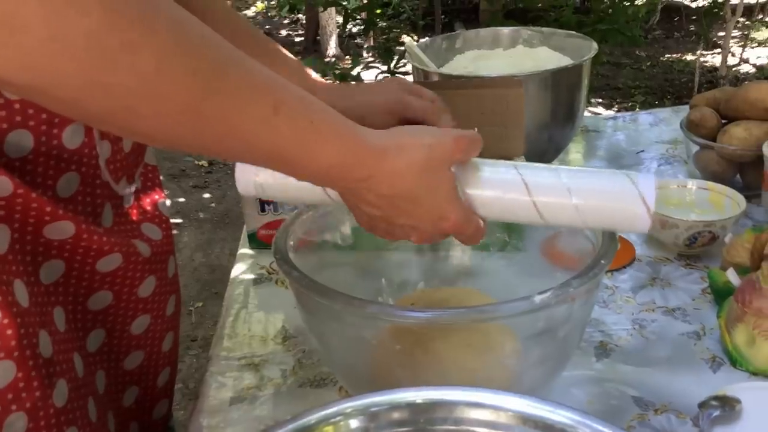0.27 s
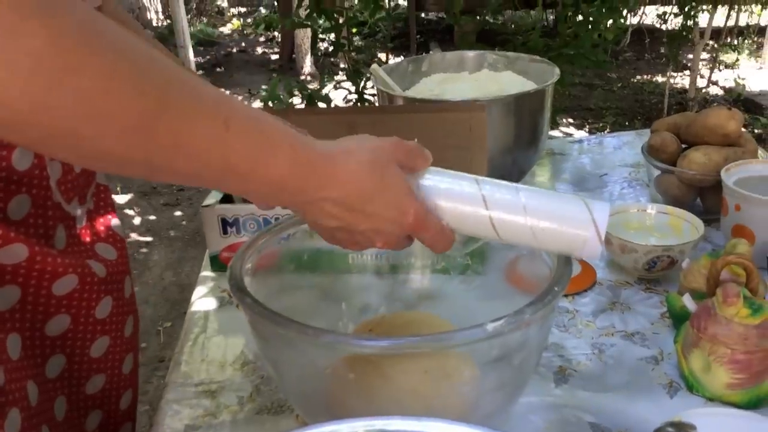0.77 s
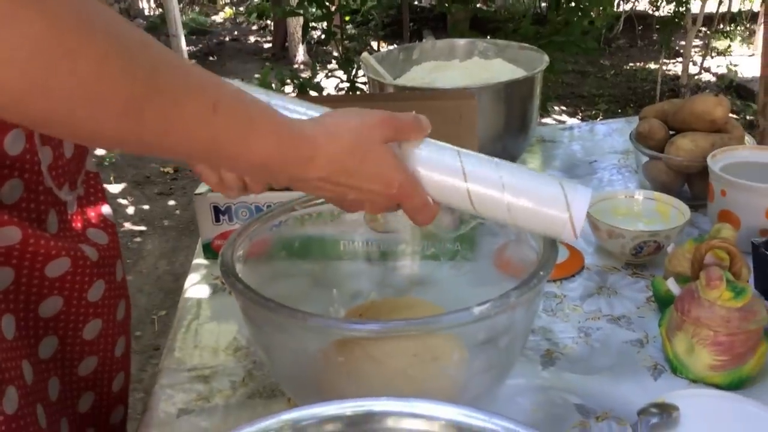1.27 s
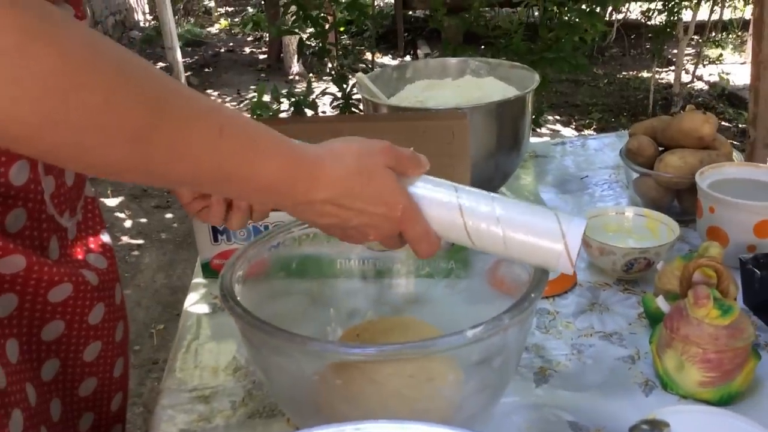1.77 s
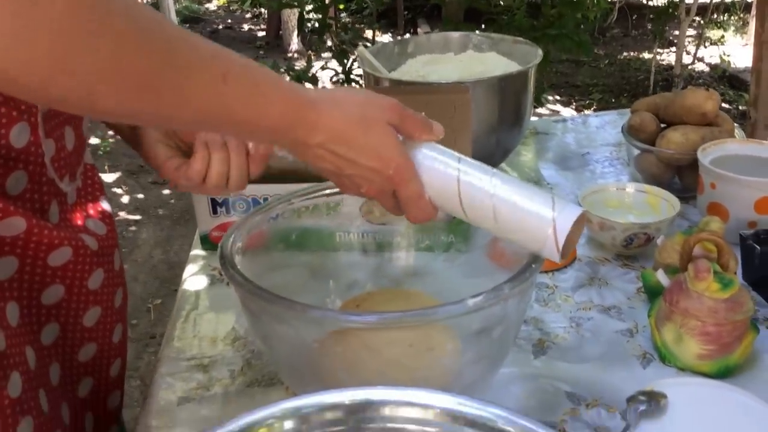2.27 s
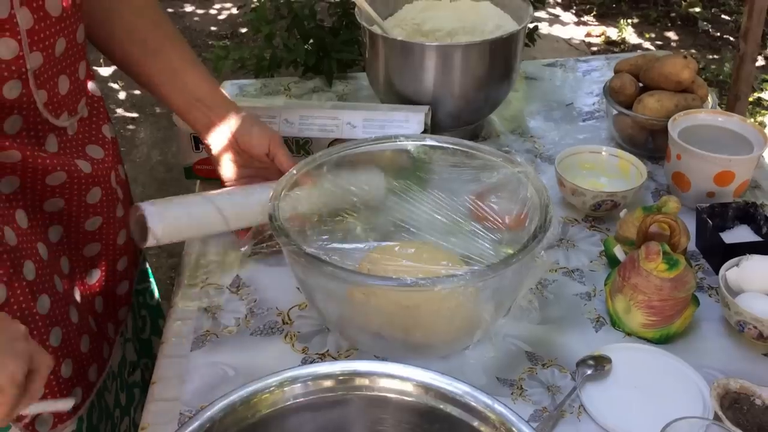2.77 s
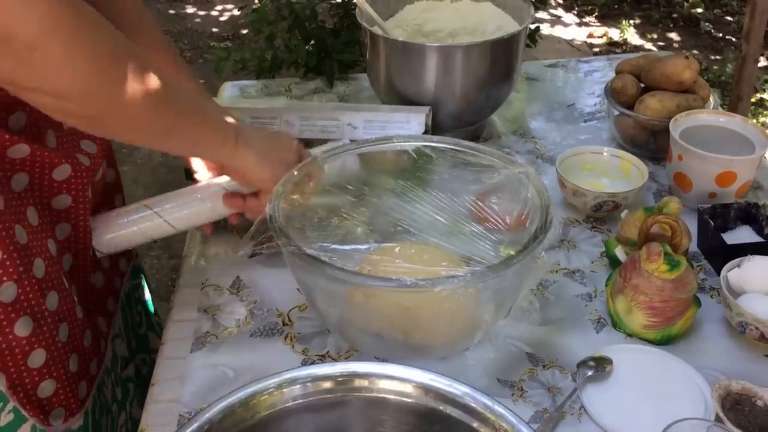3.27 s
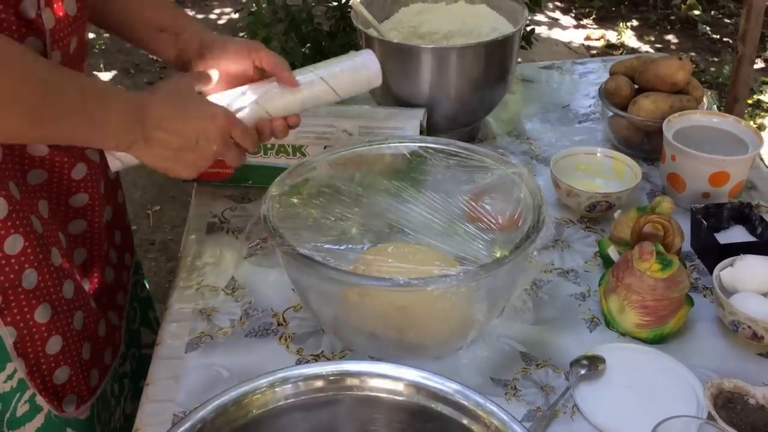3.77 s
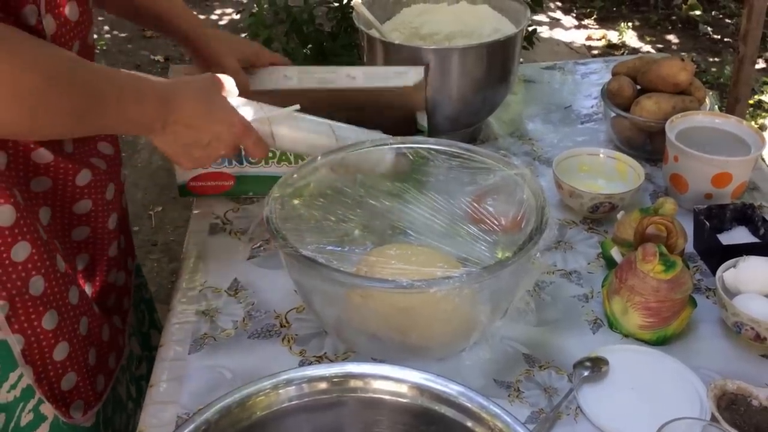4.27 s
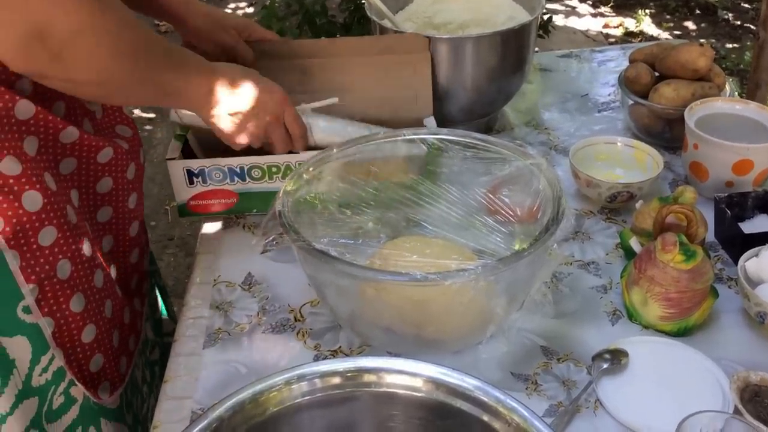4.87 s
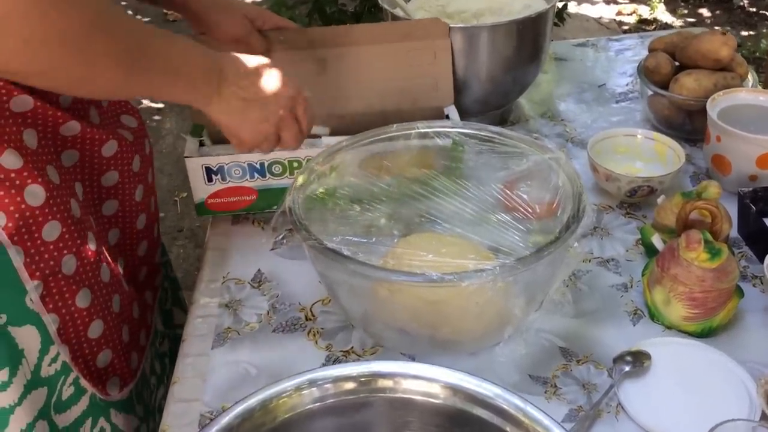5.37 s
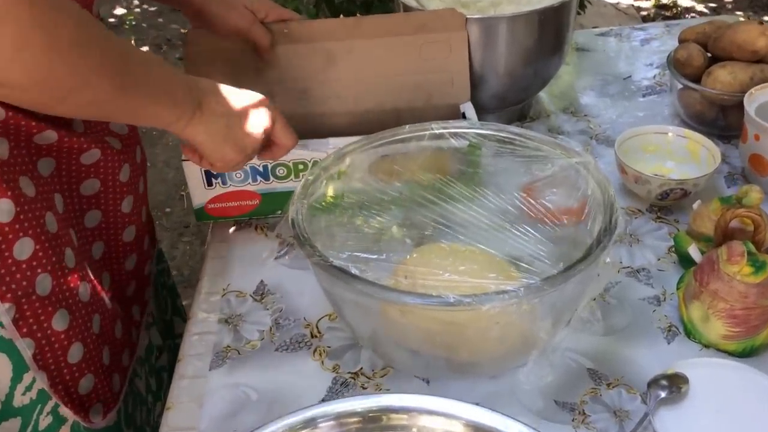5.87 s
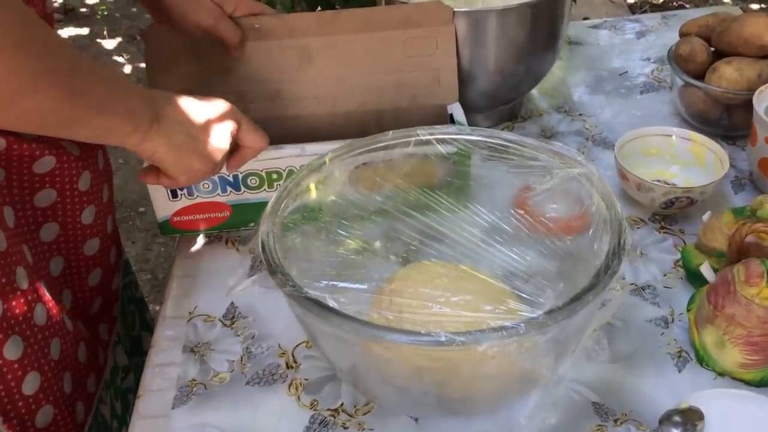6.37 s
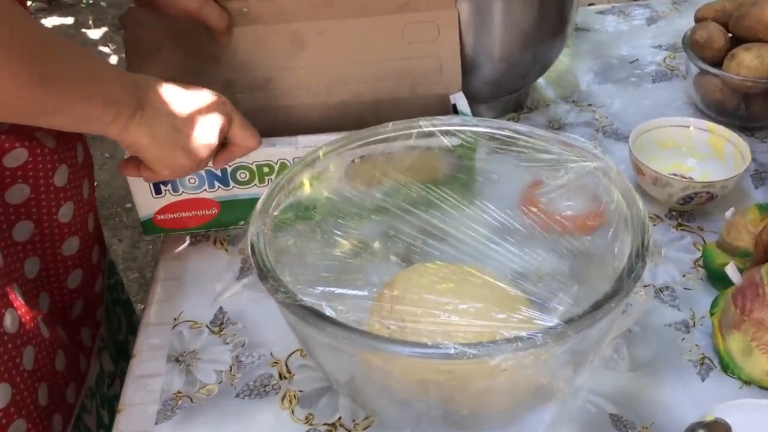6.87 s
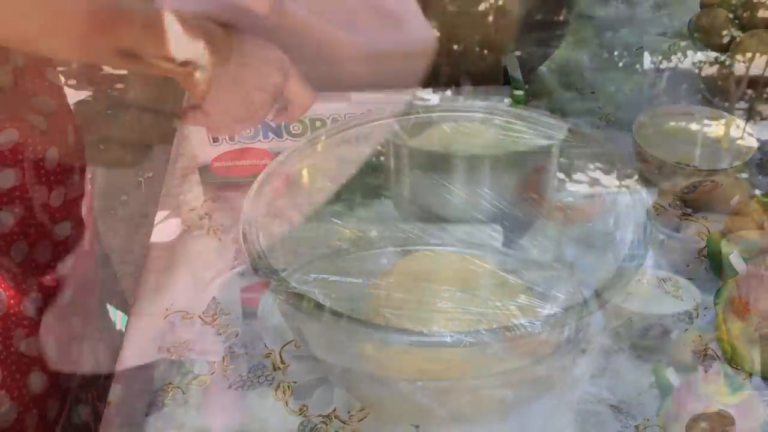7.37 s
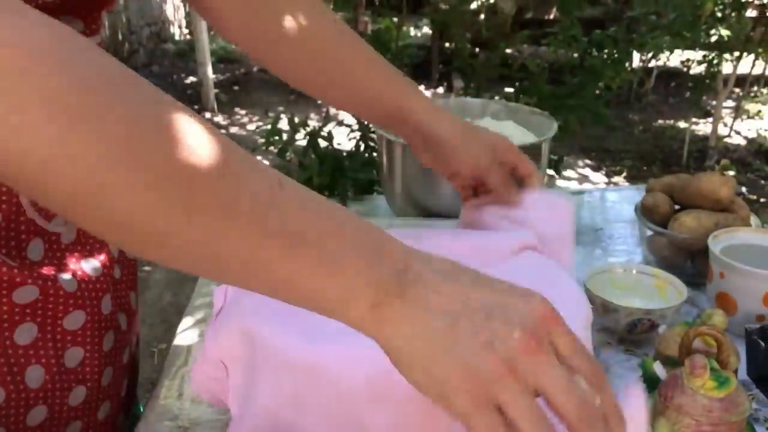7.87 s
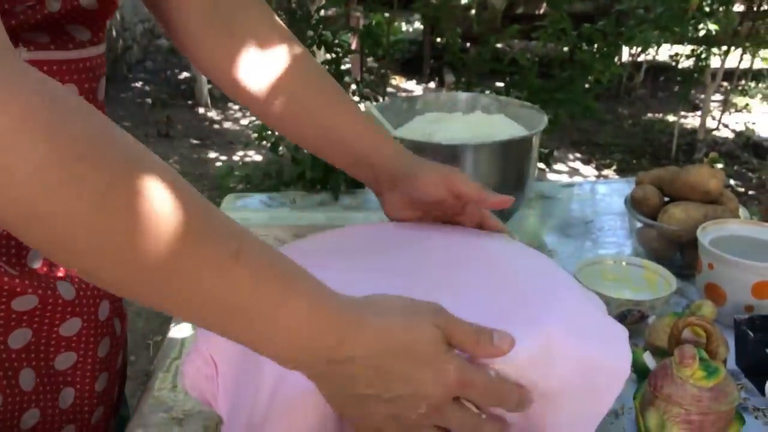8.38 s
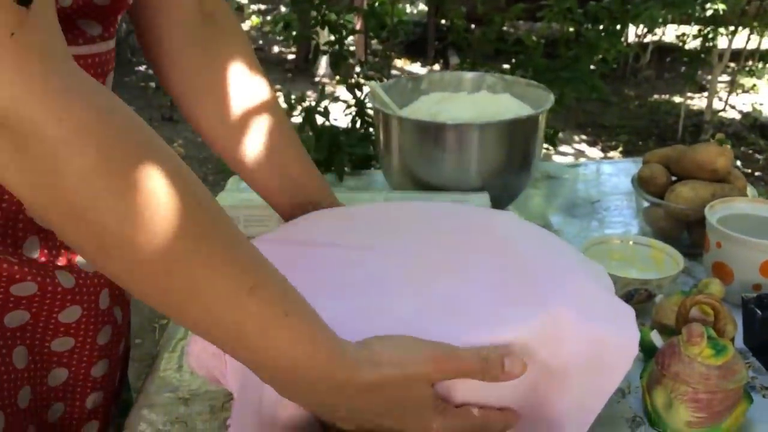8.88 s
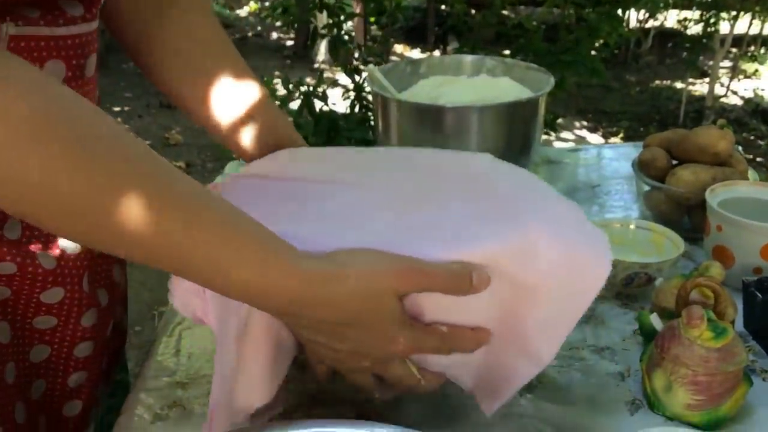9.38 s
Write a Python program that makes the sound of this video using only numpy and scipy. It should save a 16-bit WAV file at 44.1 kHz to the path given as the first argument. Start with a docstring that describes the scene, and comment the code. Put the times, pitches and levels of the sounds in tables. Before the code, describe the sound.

Falling bird whistles and soft outdoor air open the scene. Near the microphone, cling film crackles and bursts into crisp snaps, with a faint glassy ring. Hollow taps and paper rubbing follow, building to a loud drop of the roll into a cardboard box on a table. Light knocks and scuffs, a very brief silence, gentle cloth strokes and a last small snap end it.

```python
"""A table in a garden: cling film is stretched over a glass bowl and torn off, with crackles and sharp snaps.
The cardboard roll is handled and dropped into its carton, the lid is tucked in, a cloth is laid over the bowl.
Small birds whistle in the trees, over soft outdoor air.
Snaps, friction and air are filtered noise; cardboard, table and glass ring as damped resonances;
the birds are gliding sines."""
import sys
import numpy as np
from scipy import signal
from scipy.io import wavfile
from scipy.ndimage import uniform_filter1d

SR = 44100
rng = np.random.default_rng(int(sys.argv[2]) if len(sys.argv) > 2 else 0)


def wav_record(signal):
    """Record a signal, one row per channel, as 16-bit PCM in the file named by sys.argv[1]."""
    frames = np.transpose(np.atleast_2d(signal))
    bounded = np.clip(frames, -1, 1)
    # unit amplitude maps onto the largest positive 16-bit level
    quanta = np.round(bounded * 32767).astype(np.int16)
    wavfile.write(sys.argv[1], SR, quanta)


N = 424241
TIME = np.arange(N) / SR
AGE = TIME[:SR // 4]  # seconds since the start of a short event


def amp(db):
    """Decibels to gain."""
    return 10 ** (np.asarray(db) / 20)


def unit(x):
    """Scales to rms 1."""
    return x / np.sqrt(np.mean(x ** 2) + 1e-20)


def blow(x, span=0.0098):
    """Scales a short sound so that its energy equals rms 1 over span seconds."""
    return x * np.sqrt(span * SR / (np.sum(x ** 2) + 1e-20))


def add(mix, s, sound):
    """Adds a sound into the mix at time s."""
    part = mix[max(round(s * SR), 0):][:len(sound)]
    part += sound[:len(part)]


def colour(x, points):
    """Causal (minimum-phase) filter with the given spectrum, drawn over log frequency."""
    hz, db = np.transpose(points)
    bins_hz = abs(np.fft.fftfreq(4096, 1 / SR)) + 1
    log_gain = np.log(amp(np.interp(np.log(bins_hz), np.log(hz), db)))
    taps = np.fft.ifft(np.exp(np.conj(signal.hilbert(log_gain)))).real
    return signal.oaconvolve(x, taps[:len(taps) // 2])[:len(x)]


def band(x, hz, kind, order=3):
    """Butterworth filter."""
    return signal.sosfilt(signal.butter(order, hz, kind, fs=SR, output="sos"), x)


def ring(x, modes):
    """Passes x through a few parallel resonances."""
    return sum(amp(db) * signal.lfilter(*signal.iirpeak(hz, hz / width, SR), x) for hz, width, db in modes)


def drift(rate_hz):
    """Random wander around 0: straight lines between rate_hz normal random values a second."""
    knots = rng.standard_normal(N // 50)
    return np.interp(TIME * rate_hz, np.arange(len(knots)), knots)


def grains(per_s, spread_db, smooth):
    """Tiny random slips, sized by spread_db, over a share of smooth friction noise."""
    size = amp(spread_db * np.minimum(rng.exponential(1, N), 4))
    clicks = size * rng.choice([-1, 1], N) * (rng.random(N) < per_s / SR)
    return unit(unit(clicks) + smooth * rng.standard_normal(N))


def clump_level(hits, decay):
    """Level of a stream of hits that each die away in decay seconds, from their summed power."""
    return np.sqrt(signal.lfilter([1], [1, -np.exp(-2 / (decay * SR))], hits ** 2))


def note(hz, contact, decay, linger_db, linger):
    """A damped resonance that swells during the contact, then dies, leaving a fainter, longer ring."""
    contact = max(contact, .001)
    swell = np.sin(np.pi / 2 * np.minimum(AGE / contact, 1)) ** 2
    after = np.maximum(AGE - contact, 0)
    fade = np.exp(-after / decay) + amp(linger_db) * np.exp(-after / linger)
    return swell * fade * np.sin(2 * np.pi * hz * AGE)


def stroke(s, half, shape=2):
    """A hand speeds up and slows down around time s; a lower shape gives a sharper peak with longer flanks."""
    return np.exp(-np.minimum(abs((TIME - s) / half) ** shape, 30))


def strokes(rows):
    """Gain over time from a table of hand movements."""
    return sum(amp(db) * stroke(s, half) for s, half, db in rows)


def during(start, end, fade=0.033):
    """Gain 1 between two times, with soft edges."""
    return np.clip((TIME - start) / fade, 0, 1) * np.clip((end - TIME) / fade, 0, 1)


# Spectrum of the outdoor air. Each row: frequency in Hz, density in dB per Hz.
GARDEN = [(15, -56), (25, -36), (55, 0), (183, -3), (260, -8.5), (389, -5.5), (495, -13.5), (945, -14.5),
          (1380, -16.5), (1570, -19.5), (2360, -21.5), (3170, -18.5), (11200, -28), (15500, -33.5)]
GARDEN_DB = -56.5


def garden(patchy_db=2.15):
    """Soft outdoor air: coloured noise whose level drifts in patches of time and pitch."""
    z = signal.stft(colour(rng.standard_normal(N), GARDEN), nperseg=1024)[2]
    patches = uniform_filter1d(rng.standard_normal(z.shape), size=5, axis=0)
    patches = unit(uniform_filter1d(patches, size=7, axis=1))
    air = signal.istft(z * amp(patchy_db * patches), nperseg=1024)[1][:N]
    return amp(GARDEN_DB) * unit(air) * amp(0.1 * drift(9.7))


def far_birds(count=30, db=-64):
    """Faint chirps from deeper in the trees: sinking sines at random moments."""
    out = np.zeros(N)
    for when, pitch, length, size in rng.random((count, 4)):
        u = np.linspace(0, 1, round((0.16 + 0.088 * length) * SR))
        hz = (3100 + 1700 * pitch) * (1 - 0.18 * u)
        chirp = np.sin(np.pi * u) * np.sin(2 * np.pi * np.cumsum(hz) / SR)
        add(out, when * N / SR, amp(db - 3.6 * size) * chirp)
    return out


# A small bird's falling whistles.
# Each row: start in seconds, length in seconds, first pitch in Hz, level in dB before the distance trim.
WHISTLES = [(0.144, 0.078, 3370, -50.5), (0.307, 0.079, 3360, -63), (0.387, 0.13, 4470, -63),
            (0.573, .1, 3450, -48), (0.683, 0.11, 3910, -47.5), (0.906, 0.054, 3530, -49),
            (1.036, 0.096, 4070, -54), (1.121, 0.043, 3760, -50), (2.118, 0.087, 3610, -50),
            (2.99, 0.044, 3600, -57), (3.217, 0.068, 3830, -56), (6.595, 0.082, 4010, -56),
            (6.967, 0.1, 3960, -53.5), (8.4, 0.059, 3430, -60)]
# each whistle sinks by this share of its pitch, a little faster towards the end
FALL, FALL_CURVE = .28, 1.1
# Drawn-out, arched calls of birds farther off. Each row: start in seconds, length in seconds,
# top pitch in Hz, arch as a share of pitch, level in dB before the distance trim.
CALLS_FAR = [(6.38, .16, 2570, .2, -60), (6.41, .14, 4900, .05, -64), (7.72, .1, 1105, .02, -64),
             (7.85, .3, 2770, .02, -61), (7.88, .44, 1335, .03, -63), (8.06, .05, 1340, .03, -57),
             (8.19, .09, 3020, .03, -61)]
# each such call has a second, higher tone: pitch ratio, dB re the first
CALL_UPPER, CALL_UPPER_DB = 1.21, -6


def bird(waver=.012):
    """Falling whistles and arched calls: gliding sines that waver in pitch and throb in level."""
    out, wobble = np.zeros(N), drift(260)
    throb = amp(3.5 * drift(120))

    def sing(s, hz, db):
        """Sounds one pitch curve."""
        here = round(s * SR) + np.arange(len(hz))
        turns = np.cumsum(hz * (1 + waver * wobble[here])) / SR
        envelope = throb[here] * signal.windows.tukey(len(hz), .35)
        add(out, s, amp(db) * envelope * np.sin(2 * np.pi * turns))

    for s, length, first_hz, db in WHISTLES:
        u = np.linspace(0, 1, round(length * SR))
        sing(s, first_hz * (1 - FALL * u ** FALL_CURVE), db)
    for s, length, top_hz, arch, db in CALLS_FAR:
        hz = top_hz * (1 - arch * np.linspace(-1, .7, round(length * SR)) ** 2)
        sing(s, hz, db)
        sing(s, hz * CALL_UPPER, db + CALL_UPPER_DB)
    return out


# Heavy things are set on the table.
# Each row: start in seconds, level in dB, pitch in Hz, contact time in seconds (1 ms at least).
THUDS = [(2.543, -33.5, 244, 0.014), (3.406, -31.5, 202, 0.0026), (4.239, -28, 159, .014),
         (5.142, -18, 159.6, 0.003), (5.196, -1, 135, 0.0031), (5.218, -12, 194, 0.0057),
         (5.242, -26, 123, 0.017), (7.101, -36.5, 173, 0.004), (7.416, -33, 122, .002),
         (7.919, -31, 185, 0.0054), (9.249, -36.5, 191, 0.0062)]
BUMP_DB, BUMP_HZ = -12.5, 125  # every knock also shakes the table: dB re its hollow note, pitch


def table(bump_decay=0.0019):
    """The table top gives a low, quickly damped bump under every knock and everything set down."""
    out = np.zeros(N)
    for s, db, hz, contact in THUDS:
        add(out, s, amp(db) * note(hz, contact, decay=.008, linger_db=-26, linger=.03))
    for s, db, *_ in KNOCKS:
        bump = note(BUMP_HZ, CONTACT_S, decay=bump_decay, linger_db=-20.5, linger=0.058)
        add(out, s, amp(db + BUMP_DB) * bump)
    return band(out, 68, "high", order=4)


# The bowl is nudged. Each row: start in seconds, level in dB.
NUDGES = [(1.394, -35), (3.365, -52.5)]
# Modes of the glass. Each row: pitch in Hz, level in dB re the nudge, time to fall 60 dB in seconds.
BOWL = [(1034, -3.5, 0.6), (1990, -2, 0.22), (2794, -22, 0.62)]


def bowl():
    """The glass rings softly when nudged: a few sines, each with its own decay."""
    out, t = np.zeros(N), TIME[:SR]
    chime = sum(amp(db - 60 * t / t60) * np.sin(2 * np.pi * hz * t) for hz, db, t60 in BOWL)
    for s, db in NUDGES:
        add(out, s, amp(db) * chime)
    return out


# Cardboard, film or cloth slides. Each row: middle in seconds, half length in seconds,
# rub level in dB and hiss level in dB, both before the trims of friction().
SLIDES = [(1.567, 0.025, -57, -51), (2.62, 0.071, -63, -38.5), (2.995, 0.044, -64, -54.5),
          (3.565, 0.42, -58, -58.5), (3.977, 0.068, -53, -51), (4.46, 0.21, -50, -57.5),
          (4.676, 0.063, -56, -52.5), (5.006, 0.083, -46.5, -49), (5.164, 0.028, -32, -36.5),
          (5.339, 0.049, -35.5, -44.5), (5.72, 0.6, -56, -58.5), (6.03, 0.083, -52, -57.5),
          (6.28, 0.14, -56, -96.5), (7.212, 0.057, -38.5, -39.5), (7.384, 0.1, -63, -61),
          (7.549, 0.032, -76, -58), (7.953, 0.051, -53, -53), (8.095, 0.024, -81, -52.5),
          (8.247, 0.081, -56, -56)]
# The cloth is smoothed over the bowl.
# Each row: middle in seconds, half length in seconds, level in dB before the cloth trim.
BRUSHES = [(8.45, 0.19, -53), (8.95, 0.37, -57)]
# Spectra of the low rub, the bright hiss and the cloth. Each row: frequency in Hz, density in dB per Hz.
RUB = [(200, -2), (600, -2), (1000, 0), (1600, -3), (2400, -9), (3400, -6.5), (5000, -44.5), (9000, -35.5)]
HISS = [(1000, -32), (2500, 2), (4000, 6), (7000, 3), (10000, -3), (15500, -16)]
FABRIC = [(290, -42.5), (500, 4.5), (815, -12), (1010, 0), (1560, -9), (2010, -2.5), (2610, -4), (5590, -7),
          (15500, -20.5)]


def friction(rub_db=-3, hiss_db=0, cloth_db=-3, shape=1.35):
    """Paper fibres catch and slip as the cardboard slides; the cloth brushes softly and unevenly."""
    slips = grains(per_s=2000, spread_db=3, smooth=2) * amp(1.8 * drift(70))
    rub = amp(rub_db) * unit(colour(slips, RUB))
    hiss = amp(hiss_db) * unit(colour(grains(per_s=4400, spread_db=6, smooth=1.1), HISS))
    threads = grains(per_s=1500, spread_db=4, smooth=1) * amp(1.5 * drift(30))
    cloth = amp(cloth_db) * strokes(BRUSHES) * unit(colour(threads, FABRIC))
    sliding = np.zeros(N)
    for s, half, low_db, high_db in SLIDES:
        sliding += stroke(s, half, shape) * (amp(low_db) * rub + amp(high_db) * hiss)
    return sliding + cloth


# Cardboard squeaks faintly as it drags.
# Each row: middle in seconds, half length in seconds, pitch in Hz, level in dB.
SQUEAKS = [(3.72, .015, 2650, -56), (4.535, 0.024, 2380, -53.5), (4.58, 0.0083, 2410, -38),
           (4.838, .01, 4750, -48), (5.342, 0.0053, 3260, -40), (6.564, 0.011, 3000, -55),
           (7.22, 0.06, 3020, -52), (9.283, .005, 3000, -42)]


def squeaks(width_hz=130):
    """Stick and slip at a rough pitch: noise through one narrow resonance."""
    slips, out = rng.standard_normal(N), np.zeros(N)
    for s, half, hz, db in SQUEAKS:
        out += amp(db) * stroke(s, half) * unit(ring(slips, [(hz, width_hz, 0)]))
    return out


# Short scrapes of cardboard.
# Each row: middle in seconds, half length in seconds, level in dB, grit in dB re that level.
SCUFFS = [(2.194, 0.042, -52.5, -7), (2.628, 0.092, -43, -4), (2.798, 0.025, -50, -9),
          (2.99, 0.035, -50, -16), (3.367, 0.011, -41.5, 0.5), (3.441, .03, -53.5, -0.5),
          (3.53, 0.019, -54, 4), (3.993, 0.064, -64.5, 13.5), (4.269, 0.036, -44.5, -8),
          (4.564, 0.059, -47, -9), (4.587, 0.0091, -30.5, -6.5), (4.84, 0.013, -48, 7.5),
          (4.988, 0.014, -35.5, -8), (5.125, 0.0083, -22.5, -4.5), (5.185, 0.027, -28.5, -5),
          (5.199, 0.0055, -13, -5.5), (5.344, 0.0092, -29, -3.5), (5.397, 0.068, -46.5, -35),
          (5.552, 0.016, -44.5, -11), (6.323, .004, -36, -3), (6.338, 0.0059, -26, -7.5),
          (6.568, 0.0097, -43, -10.5), (6.862, 0.014, -37, -2.5), (7.264, 0.13, -49, -6.5),
          (8.503, 0.011, -51.5, 4), (9.294, 0.0091, -43.5, -23)]
SCUFF_BORE_DB, SCUFF_WALLS_DB = 1, -1.5  # share of a scrape that reaches the bore and the walls
# Resonances of the carton walls and of the roll's bore. Each row: pitch in Hz, width in Hz, gain in dB.
WALLS = [(717, 44, -1), (855, 240, 10.5), (965, 28, 11.5), (1238, 29, 5)]
BORE = [(388.4, 79, 3.5), (446, 9, 0.5), (491, 14, -12), (268, 58, -2)]
# Spectrum of the gritty paper surface. Each row: frequency in Hz, density in dB per Hz.
GRIT = [(700, -21), (1500, 6), (2250, 2), (2700, -4), (3400, -2), (4600, -10.5), (7000, -17), (11000, -26),
        (15500, -40)]


def scuffs():
    """Dragging cardboard feeds a stream of slips into the bore, the walls and the paper surface."""
    slips = grains(per_s=1500, spread_db=0, smooth=0.2)
    bore = unit(band(ring(slips, BORE), [130, 900], "band", order=2))
    walls = unit(band(ring(slips, WALLS), [500, 1700], "band", order=2))
    body = amp(SCUFF_BORE_DB) * bore + amp(SCUFF_WALLS_DB) * walls
    grit = unit(colour(slips, GRIT))
    return sum(amp(db) * stroke(s, half) * (body + amp(grit_db) * grit) for s, half, db, grit_db in SCUFFS)


# Fingers tap the hollow roll. Each row: start in seconds, level in dB, pitch in Hz.
TAPS = [(1.036, -45, 414), (1.285, -42, 332), (1.878, -45.5, 412), (2.088, -38.5, 402), (2.203, -44.5, 523),
        (2.316, -37, 426), (2.798, -41, 410), (2.996, -35.5, 470), (3.193, -31.5, 384), (3.371, -30, 400),
        (3.53, -33.5, 452), (3.625, -37.5, 492), (3.712, -31, 460), (3.862, -30, 479), (4.118, -36.5, 503)]
FINGER_S = 0.0048  # a fingertip lands more softly than a knock
# hands rub the roll while they hold it, and shift their grip after every tap or knock
HELD_FROM_S, HELD_TO_S, HOLD_DB = 0.607, 5.6, -57.5
REGRIP_DB, REGRIP_S = -29.5, 0.063  # level re the touch, time to settle


def roll(skin_db=-17, skin=0.02, wall_db=-27):
    """Fingers tap and rub the cardboard roll: its bore answers, and the skin rustles on the wrapping."""
    grip = amp(HOLD_DB) * during(HELD_FROM_S, HELD_TO_S)
    for s, db, *_ in TAPS + KNOCKS:
        add(grip, s, amp(db + REGRIP_DB) * np.exp(-TIME[:SR] / REGRIP_S))
    rubbing = ring(grains(per_s=300, spread_db=4, smooth=.8), BORE)
    out = grip * unit(band(rubbing, [150, 900], "band", order=2))
    for s, db, hz in TAPS:
        touch = np.minimum(AGE / FINGER_S, 1) * np.exp(-AGE / skin) * rng.standard_normal(len(AGE))
        rustle = amp(skin_db) * blow(band(touch, [200, 1000], "band", order=1))
        rattle = amp(wall_db) * blow(ring(touch, WALLS))
        hollow = note(hz, FINGER_S, decay=0.0061, linger_db=-1.5, linger=0.016)
        add(out, s, amp(db) * (hollow + rustle + rattle))
    return out


# Knocks on cardboard. Each row: start in seconds, hollow note in dB, its pitch in Hz,
# clack of the walls in dB, grit in dB before its trim.
KNOCKS = [(1.392, -26.5, 475, -36, -25), (2.0452, -24.5, 478, -31.5, -18.5), (2.566, -55, 390, -51, -34),
          (2.598, -29, 523, -39, -28), (4.313, -15.5, 523, -18, -21), (4.32, -16.5, 385, -45, -27),
          (4.473, -20.5, 500, -29, -47), (4.981, -15, 442, -29, -51), (5.018, -5, 433, -27.5, -53),
          (5.089, -28.5, 415, -43, -58), (5.122, -33, 368, -32, -32), (5.196, -9.5, 420, -30, -28),
          (5.927, -30.5, 403, -40, -45.5), (5.991, -38, 344, -36, -48), (6.022, -25.5, 404, -22, -48),
          (6.035, -24, 366, -32, -32), (6.121, -25.5, 362, -26, -21), (6.159, -28.5, 394, -52, -60),
          (6.266, -27.5, 328, -32.5, -46), (6.373, -29, 358, -36.5, -48), (6.554, -37, 295, -47.5, -54),
          (7.02, -45.5, 330, -42, -40.5), (7.248, -27.5, 334, -55, -46), (7.414, -25.5, 340, -36, -37),
          (7.934, -29, 279, -45, -41.5), (9.28, -39.5, 447, -49, -41)]
CONTACT_S = 0.0038  # how long a knock presses on the cardboard


def knocks(tail_db=-26, scuff=1.0, spike=3.6):
    """Each knock sounds the air in the roll, rattles the walls and scuffs the paper surface."""
    out = np.zeros(N)
    settling = np.exp(-AGE / .012)
    u = AGE / CONTACT_S
    force = u * np.exp(1 - u * scuff) + amp(tail_db) * settling
    for s, db, hz, clack_db, grit_db in KNOCKS:
        burst = force * rng.standard_normal(len(AGE))
        burst[round(CONTACT_S * SR)] += spike
        hollow = amp(db) * note(hz, CONTACT_S, decay=0.0047, linger_db=-6.5, linger=0.011)
        box = amp(db - 14.5) * blow(ring(burst, BORE))
        clack = amp(clack_db) * blow(band(ring(burst, WALLS), [550, 1200], "band", order=3))
        grit = amp(grit_db - 5) * blow(colour(burst, GRIT))
        add(out, s, hollow + box + clack + grit)
    return band(out, 130, "high", order=2)


# Pulls on the film.
# Each row: middle in seconds, half length in seconds, level in dB before the crinkle trim.
PULLS = [(.77, 0.088, -45.5), (.99, 0.12, -40.5), (1.5, 0.51, -52), (2.25, 0.45, -47.5), (2.66, .06, -31)]
# the film is held taut until it tears, and crackles a little all the while (level before the same trim)
TORN_S, TAUT_DB = 3.16, -49
# Spectrum of the film, for crackles and snaps. Each row: frequency in Hz, density in dB per Hz.
FILM = [(300, 4.5), (900, -4), (1900, -0.5), (2800, -3.5), (4300, -0.5), (5600, -3), (6800, -1.5),
        (8500, -4.5), (12000, -8.5), (15500, -15.5)]


def crinkle(flutter=0.0049, ticks_per_s=28, tick_db=-5, tick_spread_db=3):
    """The taut film crackles finely, in clumps; every tiny fold flutters briefly, and a few tick clearly."""
    folds = grains(per_s=400, spread_db=5.5, smooth=0) * amp(3 * drift(40))
    crackle = (unit(clump_level(folds, flutter)) + .25) * rng.standard_normal(N)
    tick_hits = grains(ticks_per_s, tick_spread_db, smooth=0)
    ticks = unit(clump_level(tick_hits, .0015)) * rng.standard_normal(N)
    tension = amp(TAUT_DB) * during(0, TORN_S) + strokes(PULLS)
    film = colour(unit(crackle) + amp(tick_db) * ticks, FILM)
    return amp(-12.5) * tension * unit(band(film, 186, "high"))


# The film snaps. Each row: time in seconds, level in dB before the overall trim,
# body below about 3 kHz in dB re level before its trim, rebound in dB re the snap.
SNAPS = [(.821, -29, -7.5, -4), (0.87, -27, -8, -18), (0.943, -24, -13.5, -17), (0.983, -27.5, -3, -14),
         (1.3, -15, -10.5, 1.5), (1.394, -13.5, -6, -14), (1.408, -17, -15, -0.5), (1.7144, -3, -32, -17),
         (1.727, -3, -33, -1), (1.75, -6.5, -26, 4.5), (1.838, -15, -32, -4), (1.974, -31, -23, -34),
         (1.8491, -2, -16, -27), (1.994, -15, -12, -20), (2.0068, -13, -10, -10),
         (2.0442, -15.5, -7.5, -33), (2.091, -22, -12, -16), (2.285, -18, -11.5, -7), (2.318, -14, -8, -7),
         (2.5671, -3, -13, -15), (2.583, -13, -15, -2), (2.595, -7, -17.5, -1.5), (2.775, -26.5, -42, -29),
         (3.3605, -17, -33.5, -1.5), (6.204, -39.5, -2, -18), (6.31, -44, -4, -14), (6.471, -41, 4, -16),
         (6.684, -42.5, 4, -13), (7.021, -22.5, -9.5, -23), (9.2454, -29.5, -7.5, -16),
         (9.2812, -19, -25.5, -1.5)]
REBOUND_S = .007  # a freed fold flaps back this much later
FIZZ_DB, FIZZ_PER_BODY = -26, -0.12  # the fuller the body of a snap, the less fizz over 8 kHz
GLASS_DB, GLASS_S = -7, .0011  # each snap comes back off the glass: level, typical delay


def snaps(spike=3.55, tail_db=-17, tail=0.022, middle_db=-12.0, peel_db=-22, peel=0.0094):
    """A clinging fold starts to peel, lets go with a crack and a brief flutter, flaps back, then shivers away."""
    out, lead = np.zeros(N), SR // 50  # the peel starts 20 ms ahead of the crack
    t = AGE - lead / SR
    after = np.maximum(t, 0)
    peeling = amp(peel_db) * np.exp(-abs(t) / peel)
    flutter = np.exp(-after / .002) + amp(tail_db) * np.exp(-after / tail)
    shape = np.where(t < 0, peeling, flutter)
    for s, db, body_db, rebound_db in SNAPS:
        for delay, flap_db in (0, 0), (REBOUND_S, rebound_db):
            burst = rng.standard_normal(len(t)) * shape
            burst[lead] += spike
            crack = colour(burst, FILM)
            add(crack, GLASS_S * rng.uniform(.5, 2), amp(GLASS_DB) * crack)
            body = amp(body_db - 5.5) * blow(band(crack, [1000, 2800], "band", order=4))
            middle = amp(middle_db) * blow(band(crack, [3200, 8000], "band", order=4))
            fizz_db = FIZZ_DB + FIZZ_PER_BODY * body_db
            fizz = amp(fizz_db) * blow(band(crack, [8000, 14000], "band", order=2))
            start = s + delay + 0.001483 - lead / SR
            add(out, start, amp(db + flap_db) * (body + middle + fizz))
    return amp(-7.0) * out


def echoes(x, t60, dull_hz):
    """Scatter from the table, the walls and the leaves: sparse random reflections that die away, dulled."""
    t = TIME[:SR]
    taps = rng.standard_normal(SR) * (rng.random(SR) < .06) * (t > .004) * amp(-60 * t / t60)
    taps = band(taps, min(dull_hz, SR / 3), "low", order=1)
    return signal.oaconvolve(x, taps / np.linalg.norm(taps))[:N]


def scene():
    """Near, almost dry handling sounds; the birds are farther off, with more scatter."""
    song = bird() + far_birds()
    far = amp(-7) * song + amp(-10) * echoes(song, t60=.25, dull_hz=7000)
    cardboard = friction() + squeaks() + scuffs() + roll() + knocks()
    near = table() + bowl() + cardboard + crinkle() + snaps()
    return (garden() + far + near + amp(-17.0) * echoes(near, t60=0.11, dull_hz=6100))[None]


# The brief dropout: start and end in seconds.
MUTE = (7.442, 7.489)
EDGE_HZ = 15450  # the treble ends here


def record(dry, ceiling=0.57):
    """Peaks are rounded off, the sound drops out briefly, and the treble is cut steeply."""
    held = dry / (1 + (dry / ceiling) ** 8) ** (1 / 8)
    live = uniform_filter1d(1. * ((TIME < MUTE[0]) | (TIME > MUTE[1])), size=40)
    treble_cut = signal.firwin(511, EDGE_HZ, window=("kaiser", 9), fs=SR)
    return signal.oaconvolve(held * live, treble_cut[None], "same")


dry = scene()
out = record(dry)
wav_record(out)
```